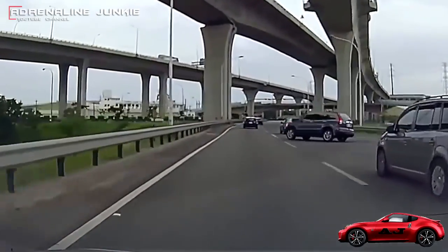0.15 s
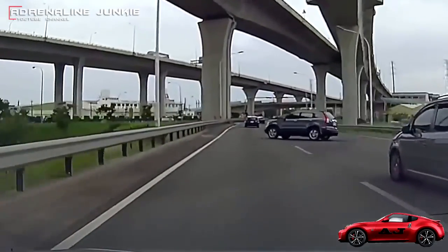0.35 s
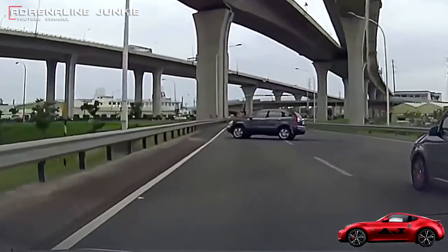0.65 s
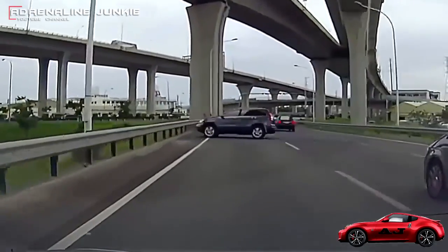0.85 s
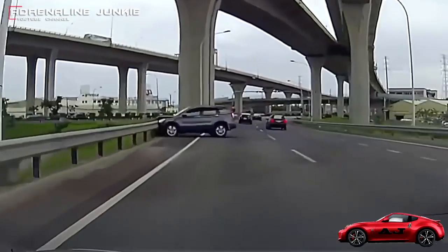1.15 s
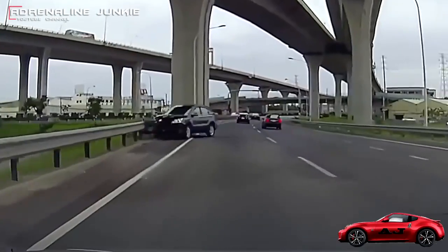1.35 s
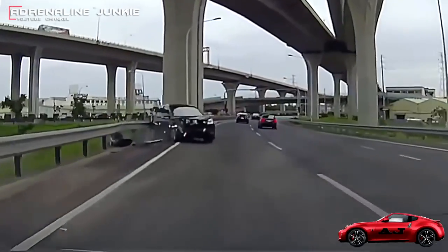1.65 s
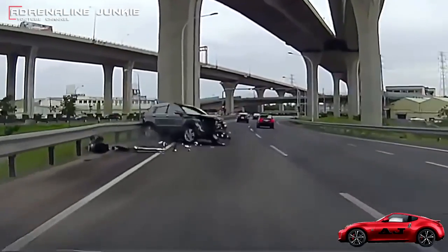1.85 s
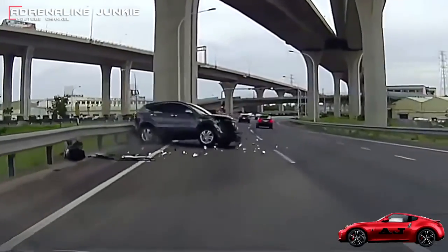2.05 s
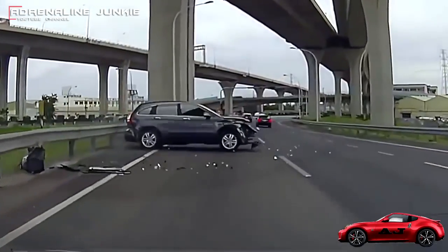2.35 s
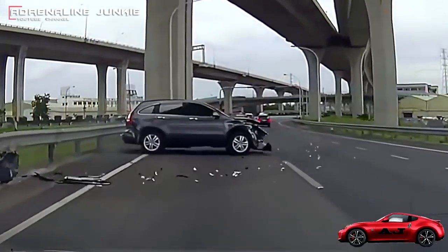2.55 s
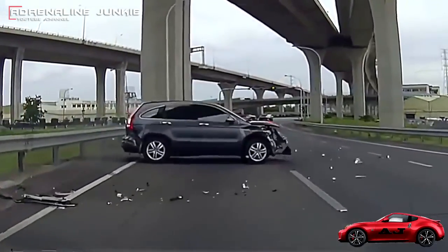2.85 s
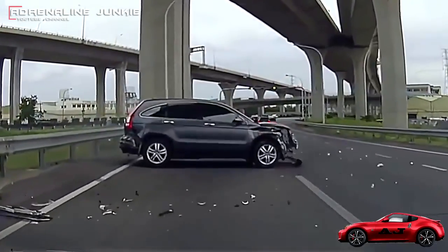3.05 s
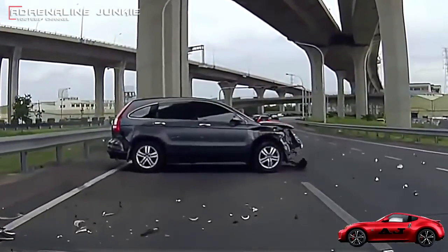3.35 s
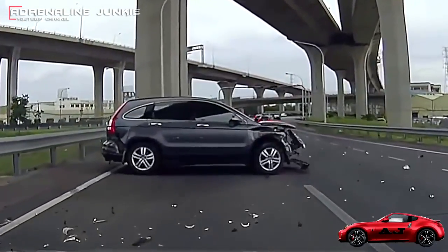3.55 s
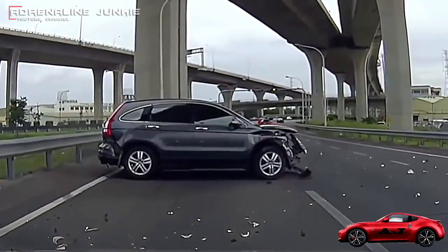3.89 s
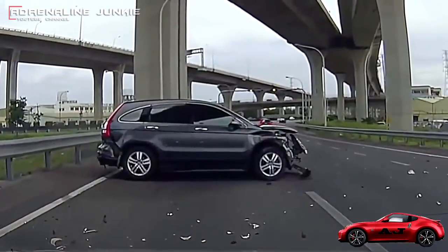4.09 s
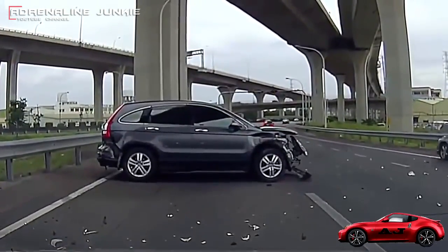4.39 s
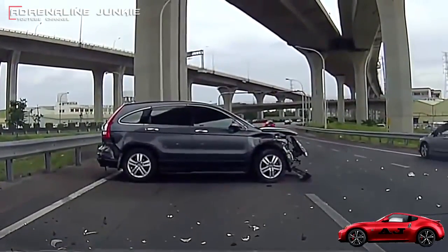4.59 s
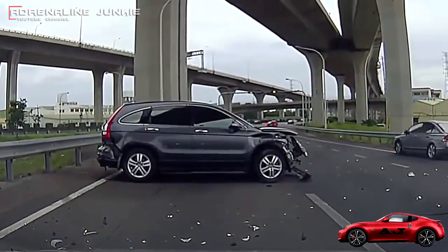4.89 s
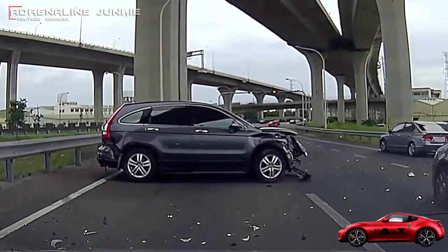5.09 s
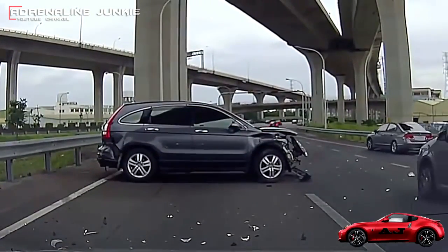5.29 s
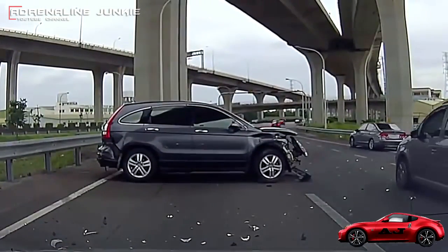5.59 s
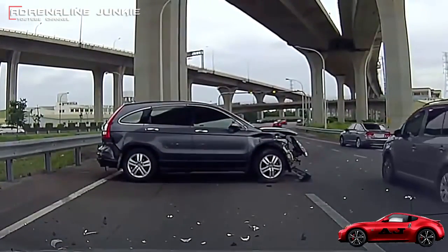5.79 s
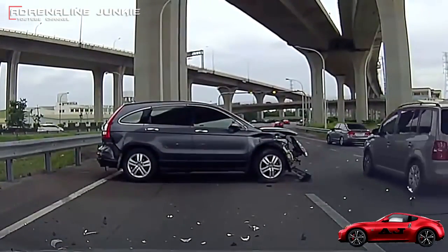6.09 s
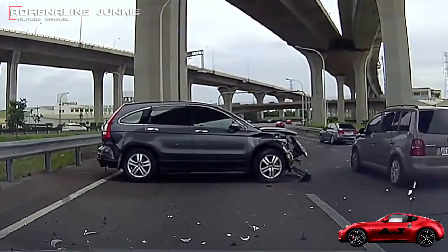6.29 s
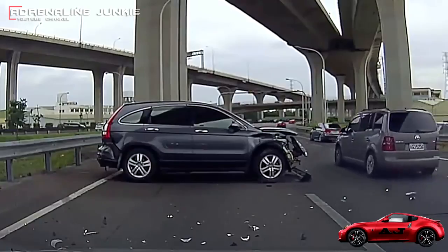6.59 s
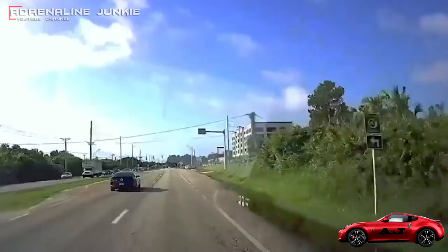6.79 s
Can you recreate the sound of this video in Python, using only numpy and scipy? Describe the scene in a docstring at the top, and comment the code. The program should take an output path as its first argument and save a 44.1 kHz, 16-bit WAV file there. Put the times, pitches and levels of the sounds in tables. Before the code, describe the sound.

Tyres squeal and a car crunches into a guard rail with splintering glass, then debris skitters, road roar fades, and plastic knocks sound in the cabin.

```python
"""On a highway, inside a braking car: another car skids across, hits the guard rail and sheds glass and plastic.
Tyres squeal by stick-slip, bodywork crumples in a dense crackle, and the squeal climbs as the slide ends.
Road roar and rumble follow the speed of the listening car, which brakes to a halt among skittering fragments.
Then the cabin hums, hard plastic knocks and clicks close by, and the sound fades out.
The microphone of a small camera adds a thin whine and limits the treble."""
import sys
import numpy as np
from scipy import signal
from scipy.fft import rfft, irfft
from scipy.io import wavfile
from scipy.ndimage import uniform_filter1d

SR = 44100
rng = np.random.default_rng(int(sys.argv[2]) if len(sys.argv) > 2 else 0)


def to_wav(s):
    """Save 16-bit WAV."""
    ch = np.atleast_2d(s).T  # columns
    pcm = np.round(np.clip(ch, -1, 1) * 32767)  # PCM
    wavfile.write(sys.argv[1], SR, pcm.astype(np.int16))


N = 305893
T = np.arange(N) / SR  # s


def amp(db):
    """Decibels to gain."""
    return 10 ** (np.asarray(db) / 20)


def unit(x):
    """Scales to rms 1."""
    return x / np.sqrt(np.mean(x ** 2) + 1e-20)


def curve(rows):
    """The second column of a table, joined by straight lines in time."""
    rows = np.array(rows, float)
    return np.interp(T, rows[:, 0], rows[:, 1])


def during(rows):
    """1 until a table ends, with a soft edge."""
    return uniform_filter1d(1. * (T <= rows[-1][0]), size=900)


def colour(x, points):
    """Filters by a spectrum of (f/Hz, level/dB) points that falls away beyond its ends."""
    hz = np.fft.rfftfreq(len(x), 1 / SR) + 1  # the 1 avoids log(0)
    f, db = np.transpose(points)
    # 12 dB per octave below the first point, 24 above the last
    ends = np.minimum(hz / f[0], 1) ** 2 * np.minimum(f[-1] / hz, 1) ** 4
    gain = ends * amp(np.interp(np.log(hz), np.log(f), db))
    return irfft(rfft(x) * gain, len(x))


def band(x, lo, hi):
    """Band-pass filter between two frequencies in Hz."""
    return signal.sosfilt(signal.butter(3, [lo, min(hi, .49 * SR)], "band", fs=SR, output="sos"), x)


def unit_in(x, lo, hi):
    """Scales so that the part within a band has rms 1."""
    return x / np.std(band(x, lo, hi))


def noise():
    """White noise as long as the scene."""
    return rng.standard_normal(N)


def wander(hz):
    """Random drift of rms 1, steeply weakened above hz."""
    f = np.fft.rfftfreq(N, 1 / SR)
    return unit(irfft(rfft(noise()) / (1 + (f / hz) ** 4), N))


def crackle(per_s, spread_db):
    """Random fractures: many small, a few large."""
    size = amp(spread_db * np.minimum(rng.exponential(1, N), 4))
    return size * rng.choice([-1, 1], N) * (rng.random(N) < per_s / SR)


def reflect(x, t60, wet_db):
    """Each fracture leaves its own short diffuse tail."""
    fall = amp(-120 / (t60 * SR))  # per sample, of the power: 60 dB in t60
    power = signal.lfilter([1 - fall], [1, -fall], x ** 2)
    return x + amp(wet_db) * np.sqrt(power) * noise()


def patchy(x, patchy_db):
    """Different pieces break from moment to moment, so the colour keeps shifting."""
    z = signal.stft(x, nperseg=256)[2]
    across_pitch = uniform_filter1d(rng.standard_normal(z.shape), size=6, axis=0)
    field = uniform_filter1d(across_pitch, size=9, axis=1)
    return signal.istft(z * amp(patchy_db * unit(field)))[1][:N]


def burst(s, build, hold, release):
    """Builds up exponentially until s, holds, then dies away; build and release are time constants."""
    before = np.minimum(T - s, 0) / build
    after = np.maximum(T - s - hold, 0) / release
    return np.exp(np.maximum(before - after, -20))


def add(mix, s, sound):
    """Mixes a sound in at a time in seconds."""
    part = mix[round(s * SR):][:len(sound)]
    part += sound[:len(part)]


ARCH_SHAPE = 0.37  # power of the arch of a bite or chirp: smaller is squarer


def arches(rows):
    """For rows of (start, length, ..): progress 0-1 through the current event, its arch, its other columns."""
    rows = np.array(rows, float)
    current = np.maximum(np.searchsorted(rows[:, 0], T) - 1, 0)
    start, length, *rest = rows[current].T
    progress = np.clip((T - start) / length, 0, 1)
    return progress, np.abs(np.sin(np.pi * progress)) ** ARCH_SHAPE, *rest


# first four partials of the squeal: relative level/dB
PARTIALS = [2, -15.5, -28, -39]
# how hard the rubber is dragged: (t/s, level/dB added to the overtones and the rasp)
DRAG = [(0, -11.5), (.31, 1), (.5, -2.5), (.68, 8.5), (.82, 3), (1.05, 2.5), (1.85, 2), (2.2, -2),
        (2.43, 2.5), (2.6, -5)]
SLIP_SCATTER = 0.15  # radians of unsteadiness added with each higher partial


def stick_slip(hz, jitter, jitter_hz, flutter_db, overtone_db):
    """Tread blocks grip and let go at an unsteady rate; harder drag sharpens each slip."""
    phase = 2 * np.pi * np.cumsum(hz * (1 + jitter * wander(jitter_hz))) / SR
    edge = amp(curve(DRAG) + overtone_db)
    scatter = SLIP_SCATTER * wander(100)
    squeal = np.zeros(N)
    for k, db in enumerate(PARTIALS):
        partial = np.sin((k + 1) * phase + k * scatter) * amp(flutter_db * wander(56))
        squeal += amp(db) * (edge if k else 1) * unit(partial)
    return squeal


# how loudly the tyres slide: (t/s, level/dB)
TYRE_SLIDE = [(0, -33.5), (.6, -30.5), (1.2, -29), (1.35, -27.5), (1.7, -31), (1.93, -29), (2.05, -39),
              (2.28, -34), (2.74, -48.5)]
# pitch of the loudest sliding tyre: (t/s, f/Hz)
TYRE_PITCH = [(0, 976), (.17, 972), (.25, 945), (.32, 981), (.51, 959), (.6, 988.5), (.96, 936),
              (1.08, 894.7), (1.62, 885), (1.71, 918.5), (1.85, 910.7), (2.28, 979.6), (2.45, 1032),
              (2.72, 1070)]
# the singing tyre catches and swells: (start t/s, length t/s, boost level/dB)
BITES = [(.072, 0.13, 10.5), (.293, 0.043, 10.5), (.43, 0.085, 3), (.535, 0.07, 5), (.643, 0.051, 7.5),
         (.755, .06, 2.5), (.84, .045, 2.5), (1.085, 0.075, 10), (1.72, 0.055, 8), (1.8, 0.078, 10),
         (2.17, 0.1, 5)]
# spectrum of rubber on grit: (f/Hz, level/dB)
RASP_SPECTRUM = [(900, -41.5), (1450, -14), (1850, 5.5), (2300, 1), (2900, -9.5), (3800, -6), (5000, -17),
                 (6800, -22), (9000, -48), (15000, -48.5)]
HOWL_DB = 2.5  # gain on the neighbouring tyres and the rasp together


def tyres():
    """One tyre sings, its neighbours howl roughly around it, and the rubber rasps on the grit."""
    _, arch, boost_db = arches(BITES)
    bite_db = arch * boost_db
    hz = curve(TYRE_PITCH)
    # the impact unloads the singing tyre
    grip = amp(np.interp(T, [1.16, 1.25, 1.58, 1.68], [-1.5, -11.5, -7, -2]))
    lead = amp(-2.0 + bite_db) * grip * stick_slip(hz, 0.014, 45, 2.5, overtone_db=-0.5)
    lower = amp(-9.5) * stick_slip(hz * .925, 0.0311, 67.0, 4.1, overtone_db=3)
    upper = amp(-11) * stick_slip(hz * 1.09, .055, 110, 2.9, overtone_db=-2)
    rasp_db = -15.5 + curve(DRAG) + 0.13 * bite_db + 1.8 * wander(49)
    rasp = unit(colour(noise(), RASP_SPECTRUM)) * amp(rasp_db)
    # the other tyres stop sliding first
    neighbours = amp(HOWL_DB + np.interp(T, [2.15, 2.45, 2.7], [0, -3, -12]))
    slide = amp(curve(TYRE_SLIDE)) * during(TYRE_SLIDE)
    return slide * (lead + neighbours * (lower + upper + rasp))


BRAKE_S, STOP_S = 0.97, 3.88  # the listening car slows evenly to a halt between these times


def speed():
    """Speed of the listening car, 1 before it brakes and 0 once it stands."""
    return np.interp(T, [BRAKE_S, STOP_S], [1, 0])


# spectrum of the shaken car body: (f/Hz, level/dB)
BOOM_SPECTRUM = [(25, -6), (40, -7), (55, -1.5), (75, -3), (105, 5), (160, 0.5), (260, 3), (500, -31.5)]
# wheel rumble at full speed, the power of speed that it follows, and what is added at any speed
RUMBLE_DB, RUMBLE_POWER, IDLE_DB = -59, 0.5, -78.5


def rumble():
    """The wheels shake the body of the car until it stands, leaving a faint idle."""
    level = amp(RUMBLE_DB) * speed() ** RUMBLE_POWER + amp(IDLE_DB)
    return level * unit(colour(noise(), BOOM_SPECTRUM))


# spectrum of the rolling car's road roar: (f/Hz, level/dB)
ROLLING_SPECTRUM = [(60, -30), (115, -7.5), (210, -13), (290, -3), (355, 3), (440, -5), (600, 2.5),
                    (850, 2.5), (1150, 0), (1500, -10), (2600, -20.5), (6500, -32), (15000, -46)]
# spectrum of the standing car's cabin hum: (f/Hz, level/dB)
STANDING_SPECTRUM = [(40, -38.5), (85, -39), (135, -18.5), (230, -13), (340, -4.5), (430, -6.5), (590, -1),
                     (980, -0.5), (1450, -13.5), (2150, -16.5), (2900, -22), (6200, -25), (9500, -30),
                     (15500, -33)]
ROLL_DB, ROLL_POWER = -37.5, 1.74  # road roar at full speed, and the power of speed that it follows
HUM_DB = -54  # cabin of the standing car


def road():
    """The roar of rolling gives way to the hum of a standing car in traffic."""
    rolling = unit_in(colour(noise(), ROLLING_SPECTRUM), 200, 720)
    standing = unit_in(colour(noise(), STANDING_SPECTRUM), 200, 720)
    roar = amp(ROLL_DB) * speed() ** ROLL_POWER * rolling
    hum = amp(HUM_DB) * np.sqrt(1 - speed()) * standing
    return (roar + hum) * amp(0.52 * wander(3.7))


# other tyres, each at its own pitch: (start t/s, length t/s, f/Hz, level/dB)
CHIRPS = [(1.008, 0.042, 873.5, -31.5), (1.048, 0.033, 1002, -26.5), (1.86, 0.063, 1175, -32),
          (2.01, 0.11, 745, -39), (2.32, 0.058, 1104, -38.5), (2.39, .11, 1120, -42.5),
          (2.51, 0.18, 1112, -49)]
CHIRP_RISE = .015  # share by which the pitch climbs during a chirp


def chirps():
    """Other tyres grip for a moment and sing a short rising note."""
    progress, arch, hz, db = arches(CHIRPS)
    rising_hz = hz * (1 + CHIRP_RISE * (progress - .5))
    return arch * amp(db) * stick_slip(rising_hz, 0.0189, 66.2, 0.81, overtone_db=9.5)


CLINKS_PER_S, CLINK_T60_S = 330, 0.047
CLINK_HZ = (1435, 5820)  # lowest and highest pitch


def clinks(spread_db):
    """Small pieces ring briefly as they tear loose, each at its own pitch."""
    out, t = np.zeros(N), T[:SR // 12]
    for when, pitch, size in rng.random((round(CLINKS_PER_S * N / SR), 3)):
        hz = CLINK_HZ[0] * (CLINK_HZ[1] / CLINK_HZ[0]) ** pitch
        ring = amp(spread_db * size - 60 * t / CLINK_T60_S) * np.sin(2 * np.pi * hz * t)
        add(out, when * N / SR, ring)
    return unit(out)


# bodywork gives way: (t/s, build-up t/s, hold t/s, panels level/dB, splintering glass level/dB),
# levels before the balance of the layers in crash()
CRUNCHES = [(1.238, 0.04, 0.019, -33, -56), (1.41, 0.029, 0.046, -28, -35), (1.49, .02, .025, -35, -37),
            (1.535, .014, 0.0081, -29, -54), (1.586, 0.0083, 0.0034, -27, -37.5),
            (1.914, .006, 0.11, -42, -49.5), (2.073, 0.012, 0.068, -33, -48),
            (2.221, .006, .01, -43.5, -56), (2.275, .003, .004, -45, -51)]
# the wreck scrapes along the rail: start t/s, build-up t/s, hold t/s, release t/s
SCRAPE = (1.33, 0.027, 0.77, 0.069)
# spectrum of buckling panels: (f/Hz, level/dB)
PANEL_SPECTRUM = [(100, -20.5), (220, -6), (300, 0.5), (480, 3.5), (620, -3.5), (800, 3.5), (1100, 7),
                  (1350, -0.5), (1900, 2), (2400, 1.5), (2800, 0), (4200, 0.5), (5400, -2.5), (7000, -9),
                  (8500, -37)]
# spectrum of splintering glass: (f/Hz, level/dB)
GLASS_SPECTRUM = [(4000, -33), (7000, 1), (9500, 0.5), (11500, -2), (15500, -12.5)]
CRUNCH_RELEASE_S = 0.034  # time constant with which a crunch dies
SCRAPE_PANELS_DB, SCRAPE_GLASS_DB = -39.5, -47.5  # before the same balance


def crash():
    """Panels buckle and glass splinters in dense fractures, crunch by crunch and along the rail."""
    buckling = patchy(reflect(crackle(1800, 2.9), 0.092, -0.069), 2.5) * amp(0.24 * wander(30))
    splinters = patchy(reflect(crackle(3100, 2.3), .04, -0.5), 1.9)
    panels = unit_in(colour(buckling, PANEL_SPECTRUM), 2600, 7000)
    glass = unit_in(colour(splinters, GLASS_SPECTRUM), 8500, 15000)
    power = np.outer(amp([SCRAPE_PANELS_DB, SCRAPE_GLASS_DB]), burst(*SCRAPE)) ** 2
    for s, build, hold, panels_db, glass_db in CRUNCHES:
        crunch = burst(s, build, hold, CRUNCH_RELEASE_S)
        power += np.outer(amp([panels_db, glass_db]), crunch) ** 2
    panel_level, glass_level = np.sqrt(power)
    # torn metal edges ring among the panels
    metal = amp(-1.43) * panels + amp(-12) * clinks(spread_db=15)
    return panel_level * metal + amp(-2.5) * glass_level * glass


# spectrum of the bass of a blow: (f/Hz, level/dB)
THUD_SPECTRUM = [(130, -42.5), (280, -8.5), (470, 4.5), (1050, 5), (1500, -4.5)]
# spectrum of its middle: (f/Hz, level/dB)
CRACK_SPECTRUM = [(1100, -14), (1700, 6), (2700, -1.5), (4500, -3), (7000, -9), (8500, -23.5)]
# spectrum of its treble: (f/Hz, level/dB)
TICK_SPECTRUM = [(5000, -3.5), (7000, 1), (10000, -5), (15000, -13.5)]


def blow(thud_db, crack_db, tick_db, ping_db, ping_hz, t60, rise):
    """A blow on hard plastic: the bass swells and lingers, the treble is sharp and short, the part pings."""
    t = T[:SR // 4]
    thud, crack, tick, ping = rng.standard_normal((4, len(t)))
    low = amp(thud_db - 60 * t / (1.04 * t60)) * unit(colour(thud, THUD_SPECTRUM))
    middle = amp(crack_db) * unit(colour(crack, CRACK_SPECTRUM))
    middle += amp(ping_db) * unit(band(ping, .88 * ping_hz, 1.12 * ping_hz))
    high = amp(tick_db - 60 * t / (0.81 * t60)) * unit(colour(tick, TICK_SPECTRUM))
    swell, onset = 1 - np.exp(-t / 0.0043), 1 - np.exp(-t / rise)
    return low * swell + (middle * amp(-60 * t / t60) + high) * onset


# parts that snap in the crash: (t/s, thud level/dB, crack level/dB, ping f/Hz, t60 of the middle t/s)
SNAPS = [(1.226, -21, -40.5, 3700, 0.27), (1.262, -21, -39.5, 3640, 0.27), (1.397, -38, -31, 3798, .083),
         (1.434, -15, -26, 3650, 0.086), (1.536, -40, -25, 5060, 0.046), (1.5799, -32.5, -9.5, 3050, 0.015),
         (1.588, -9, -17, 4500, 0.032), (1.596, -23, -21.5, 2250, 0.055), (1.677, -46, -30, 4940, 0.088),
         (1.902, -31, -30.5, 3520, 0.1), (2.084, -19, -44, 4385, 0.046), (2.275, -55, -40, 4300, .093)]
SNAP_TICK_DB, SNAP_PING_DB = -13, 1  # relative to the crack


def snaps():
    """Parts snap in the crash; small parts radiate no deep bass."""
    out = np.zeros(N)
    for s, thud_db, crack_db, ping_hz, t60 in SNAPS:
        tick_db, ping_db = crack_db + SNAP_TICK_DB, crack_db + SNAP_PING_DB
        add(out, s, blow(thud_db, crack_db, tick_db, ping_db, ping_hz, t60, rise=0.00065))
    return band(out, 150, 18000)


# fragments slide past over the asphalt: (t/s, half length t/s, level/dB)
SLIDES = [(2.7, 0.57, -61), (3.18, 0.05, -53.5), (3.382, 0.045, -61), (3.998, .09, -60.5),
          (4.815, 0.14, -55), (6.243, 0.053, -62)]
# the thin scatter under them: start t/s, build-up t/s, hold t/s, release t/s
SCATTER = (1.4, .1, 3.8, 0.38)
# spectrum of the fragments: (f/Hz, level/dB)
SHARD_SPECTRUM = [(1200, 1.5), (2200, 2.5), (3500, 1), (5200, 0.5), (6800, -5), (9000, -10), (15000, -25)]
SCATTER_DB = -63.5


def debris():
    """Pieces skitter over the road, swelling as the larger ones slide past."""
    sliding = patchy(reflect(crackle(1200, 1.3), 0.065, 0), 2.9)
    power = (amp(SCATTER_DB) * burst(*SCATTER)) ** 2
    for s, half, db in SLIDES:
        power += amp(db) ** 2 * np.exp(-((T - s) / half) ** 2)
    return np.sqrt(power) * unit(colour(sliding, SHARD_SPECTRUM))


# modes of the plastic trim before detuning and scaling: (f/Hz, width f/Hz, relative level/dB)
TRIM_MODES = [(478, 14, -8.5), (1009, 26.5, 2.5), (1280, 73, 1.5), (1807, 220, 6.5), (2375, 39, -5),
              (2940, 19, -19), (3510, 75, -8.5)]


def trim():
    """The modes of the plastic trim ring down; each is a close pair that beats."""
    t = T[:SR // 4]
    ring = np.zeros(len(t))
    for hz, width, db in TRIM_MODES:
        pair = sum(np.sin(2 * np.pi * (hz * detune * t + rng.random())) for detune in (.965, 1.02))
        ring += amp(db) * np.exp(-.85 * np.pi * width * t) * pair
    return ring * (1 - np.exp(-t / 0.00013))


# knocks and clicks in the cabin, before the common cut in knocks():
# (t/s, thud level/dB, crack level/dB, tick level/dB, ping level/dB, t60 of the middle t/s)
KNOCKS = [(2.919, -34.5, -29, -31.5, -45, 0.099), (2.933, -30.5, -33.5, -57, -51, 0.2),
          (5.297, -37, -40, -30, -27, 0.059), (5.311, -17.5, -18, -27.5, -22, 0.084),
          (5.318, -22.5, -36, -41, -43, 0.051), (5.462, -36, -56, -52, -54, 0.095),
          (5.506, -23.5, -27.5, -43, -38, .078), (5.53, -57, -36.5, -52, -38, 0.066),
          (5.675, -62, -46, -50, -42, 0.12), (5.711, -42, -42, -35, -36, .12),
          (5.717, -27.5, -30.5, -60, -48, 0.14), (5.87, -57, -46, -31.5, -30.5, 0.048),
          (5.884, -46, -41.5, -35.5, -48, 0.1), (6.065, -44, -40.5, -51, -40.5, 0.092),
          (6.182, -50, -43, -62, -62, 0.076), (6.406, -60, -43, -46, -40, 0.12),
          (6.749, -43.5, -38.5, -48.5, -42, 0.11)]
KNOCK_PING_HZ = 3290  # the same plastic part pings in every knock
TRIM_DB = -11.5  # gain of the trim modes, relative to the tabled thud


def knocks():
    """Hard plastic knocks close by in the cabin and sets the trim ringing, with no deep bass."""
    out = np.zeros(N)
    for s, thud_db, crack_db, tick_db, ping_db, t60 in KNOCKS:
        knock = blow(thud_db, crack_db, tick_db, ping_db, KNOCK_PING_HZ, t60, rise=0.00051)
        add(out, s, amp(-4.5) * knock + amp(thud_db + TRIM_DB) * trim())
    return band(out, 150, 18000)


CABIN_T60_S, CABIN_DB = 0.045, -9  # reflections between the windows of the cabin


def cabin(x):
    """Close glass and trim add a short spray of reflections to sharp sounds."""
    t = T[:SR // 16]
    taps = band(rng.standard_normal(len(t)) * amp(-60 * t / CABIN_T60_S), 1200, 18000)
    return x + amp(CABIN_DB) * signal.oaconvolve(x, taps / np.linalg.norm(taps))[:N]


def scene():
    """Everything as it reaches the windscreen."""
    sharp = cabin(crash() + snaps() + knocks())
    return (tyres() + rumble() + road() + chirps() + debris() + sharp)[None]


WHINE_HZ, WHINE_DB = 9373, -73  # centre of its slight drift, and level before the fade
FADE_S, FADE_DB_PER_S = 6.387, 38.5  # start and slope of the closing fade
NOTCH_HZ, EDGE_HZ = 7880, 15700  # treble notch, and upper band limit


def record(dry):
    """A small camera: rounded peaks, a thin electrical whine, a closing fade, a treble notch, the band limit."""
    whine_hz = WHINE_HZ + 4 * wander(30)
    whine = amp(WHINE_DB) * unit(np.sin(2 * np.pi * np.cumsum(whine_hz) / SR))
    rounded = .6 * np.tanh(dry / .6)
    fade = amp(-FADE_DB_PER_S * np.maximum(T - FADE_S, 0))
    notched = signal.lfilter(*signal.iirnotch(NOTCH_HZ, 8, SR), (rounded + whine) * fade)
    low_pass = signal.firwin(511, EDGE_HZ, window=("kaiser", 9), fs=SR)
    return signal.oaconvolve(notched, low_pass[None], "same")


dry = scene()
out = record(dry)
to_wav(out)
```